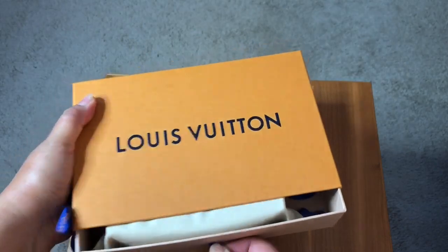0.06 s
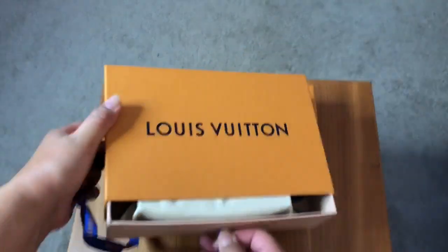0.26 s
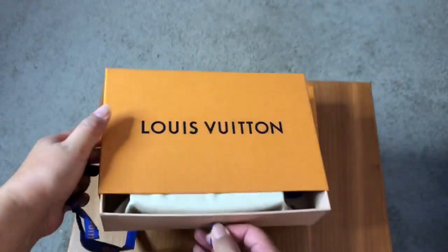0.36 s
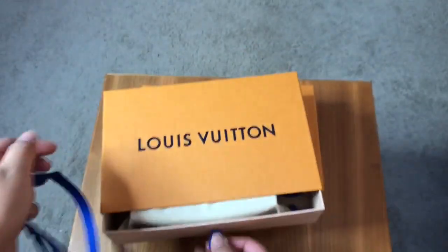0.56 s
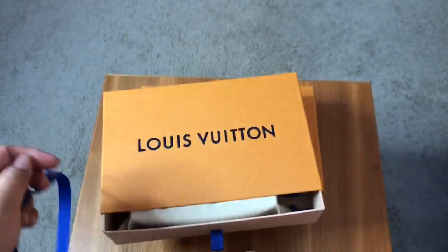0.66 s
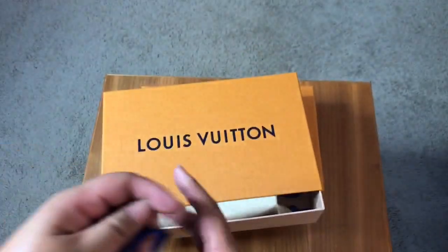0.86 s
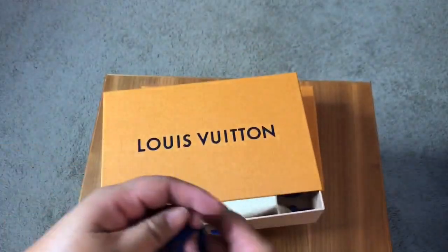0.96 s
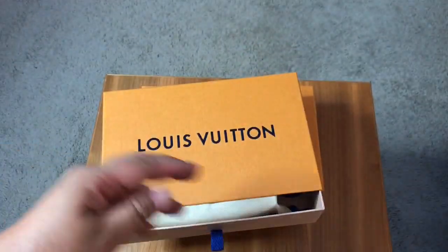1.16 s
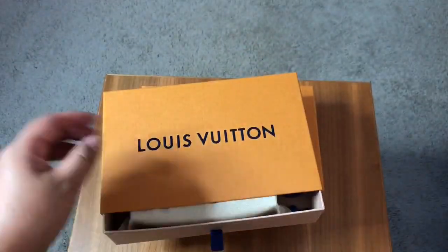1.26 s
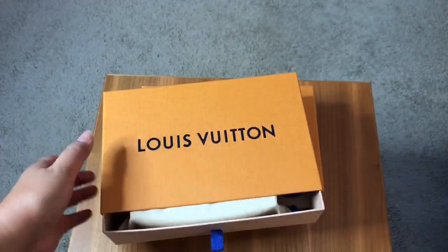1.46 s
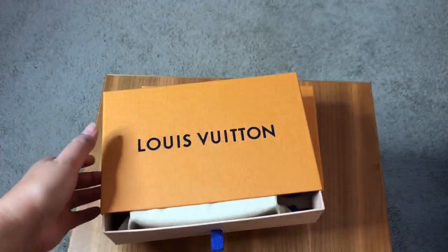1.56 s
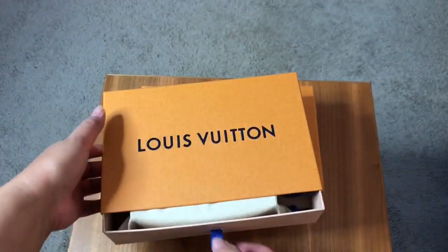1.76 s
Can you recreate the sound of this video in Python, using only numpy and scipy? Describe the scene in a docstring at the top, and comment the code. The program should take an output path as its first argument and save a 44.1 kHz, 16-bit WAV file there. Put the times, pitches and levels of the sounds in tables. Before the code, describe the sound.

Hollow double knock of a cardboard box landing on wood, then faint handling.

```python
"""In a small room, over a low rumble of air, fingers shift and tap on a cardboard gift box and a ribbon
brushes by. The box is set down on a wooden table: one edge lands with a hollow knock, pushing out air
that nudges the close microphone, then the base slaps flat and rocks. The ribbon swishes aside.
Last, the box's sleeve begins to slide with a soft rub as a fingertip taps it."""
import sys
import numpy as np
from scipy import signal
from scipy.fft import rfft, irfft, next_fast_len
from scipy.io import wavfile
from scipy.ndimage import map_coordinates

SR = 44100
rng = np.random.default_rng(int(sys.argv[2]) if len(sys.argv) > 2 else 0)


def master(y):
    """Save y as 16-bit WAV."""
    cut = np.clip(np.atleast_2d(y).T, -1, 1)
    pcm = np.round(cut * 32767)  # scale
    wavfile.write(sys.argv[1], SR, pcm.astype(np.int16))


N = 79380  # 1.8 s
TIME = np.arange(N) / SR


def gain(db):
    """Turn decibels into a number to multiply by."""
    return 10 ** (np.asarray(db) / 20)


def normalise(x):
    """Scale a sound to an average (rms) strength of 1."""
    return x / np.sqrt(np.mean(x ** 2) + 1e-20)


def value_at(points, hz):
    """Read between (frequency, value) points, spaced by octaves."""
    freqs, values = np.transpose(points)
    return np.interp(np.log(hz + 1), np.log(freqs + 1), values)


def filtered(x, gain_at):
    """Turn each frequency up or down by gain_at(hz)."""
    size = next_fast_len(N + SR // 2)
    hz = np.fft.rfftfreq(size, 1 / SR)
    return irfft(rfft(x, size) * gain_at(hz), size)[:N]


def noise(tone):
    """Noise shaped by a (frequency, level) table."""
    return normalise(filtered(rng.standard_normal(N), lambda hz: gain(value_at(tone, hz))))


def loudness(points):
    """A volume curve through (time, level) points."""
    return gain(np.interp(TIME, *np.transpose(points)))


def fade(t, fade_s):
    """Die away by 60 dB in fade_s seconds, the fade time."""
    return np.exp(-np.log(1000) * t / fade_s)


def hit(start, fade_s, attack_s=0.00027):
    """The volume curve of a blow: jump up, then die away."""
    age = np.maximum(TIME - start, 0)
    return (1 - np.exp(-age / attack_s)) * fade(age, fade_s)


def friction(tone, rough_db=2, catches_per_s=170):
    """Rubbing: noise roughened by fibres catching and letting go."""
    flutter = map_coordinates(rng.standard_normal(N), [TIME * catches_per_s])
    return normalise(noise(tone) * gain(rough_db * flutter))


# Tone of the background air (frequency [Hz], level [dB])
AIR_TONE = [(10, 5.5), (22, -8.5), (40, -18), (65, -29.5), (88, -21), (120, -32), (300, -37), (700, -50.5),
            (2000, -54.5), (8000, -59.5), (16000, -64)]
def room_air():
    """The quiet room and air on the microphone make a steady rumble."""
    return gain(-46) * noise(AIR_TONE)


# How loudly the fingers rub (time [s], level [dB])
GRIP_LEVELS = [(0, -49), (0.05, -46), (0.085, -54.5), (0.11, -45.5), (0.135, -59), (0.2, -62), (0.23, -83)]
# Tone of skin on card (frequency [Hz], level [dB])
SKIN_TONE = [(60, -17.5), (200, 4), (400, 6.5), (600, -6.5), (950, -3.5), (1600, -18), (4000, -23),
             (8000, -30.5), (15000, -46.5)]
def finger_rub():
    """Skin drags on the card as the grip shifts."""
    return loudness(GRIP_LEVELS) * friction(SKIN_TONE)


# Light finger taps (time [s], level [dB])
TAPS = [(0.108, -58.5), (1.4867, -43.5)]
# Tone of a tap (frequency [Hz], level [dB])
TAP_TONE = [(100, -20.5), (300, -9), (550, 7), (1500, 4.5), (2500, -11), (5000, -13), (9000, -21),
            (15000, -48.5)]
def finger_taps():
    """A fingertip makes a short tick, and the card rings briefly after it."""
    out = np.zeros(N)
    for start, db in TAPS:
        tick_and_ring = hit(start, fade_s=0.014) + gain(-12) * hit(start, fade_s=0.2)
        out += gain(db) * noise(TAP_TONE) * tick_and_ring
    return out


# Ribbon strokes (start [s], length [s], level [dB], brightness [dB per octave])
RIBBON_STROKES = [(0.116, 0.16, -64, -5), (0.682, 0.36, -64.5, -11.5), (0.831, .01, -67, 0),
                  (0.995, 0.09, -67.5, -0.5), (1.071, 0.028, -70, -3.5), (1.111, 0.029, -71.5, -0.5),
                  (1.15, 0.084, -74.5, 0), (1.195, 0.023, -64.5, -1.5), (1.387, 0.13, -78, -4.5)]
# Tone of the cloth (frequency [Hz], level [dB])
RIBBON_TONE = [(300, -23), (1500, -8.5), (2500, -9.5), (5500, -2.5), (9500, -4), (12000, -12.5),
               (16000, -22)]
def ribbon(tilt_above_hz=2000):
    """Soft strokes of cloth swell and fade, duller when dragged over card."""
    out = np.zeros(N)
    for start, length, db, brightness in RIBBON_STROKES:
        tilt = lambda hz: gain(brightness * np.log2(np.maximum(hz / tilt_above_hz, 1)))
        cloth = normalise(filtered(friction(RIBBON_TONE), tilt))
        swell = np.sin(np.pi * np.clip((TIME - start) / length, 0, 1))
        out += gain(db) * swell * cloth
    return out


# How the puff swells and dies (time [s], level [dB])
PUFF_LEVELS = [(0.2, -57), (0.25, -36.5), (0.4, -45.5), (0.62, -45.5), (0.72, -61), (0.85, -76)]
# Its deep tone (frequency [Hz], level [dB])
PUFF_TONE = [(10, 1), (30, -2), (65, -3.5), (110, -18), (300, -55)]
def air_puff():
    """Air pushed out from under the box nudges the microphone."""
    return loudness(PUFF_LEVELS) * noise(PUFF_TONE)


def ring(start, notes, length_s=0.25, scatter_db=1.2, detune=0.006, soften_s=0.00023):
    """Struck card rings with fading notes, a little different in level and pitch at every blow."""
    t = np.arange(int(length_s * SR)) / SR
    tones = np.zeros(len(t))
    for hz, db, fade_s in notes:
        level_luck, pitch_luck = rng.standard_normal(2)
        wave = np.sin(2 * np.pi * hz * (1 + detune * pitch_luck) * t)
        tones += gain(db + scatter_db * level_luck) * fade(t, fade_s) * wave
    soft_start = 1 - np.exp(-t / soften_s)  # card gives a little as it lands
    return np.interp(TIME - start, t, tones * soft_start, left=0, right=0)


# Notes of the box's air and broad faces (frequency [Hz], level [dB], fade time [s])
HOLLOW_NOTES = [(150.5, -23, 0.07), (217.1, -17, 0.2), (286.8, 2, 0.066), (326.4, -3.5, 0.06),
                (382, -16.5, 0.29)]
# Tone of the dull push on the table (frequency [Hz], level [dB])
THUD_TONE = [(20, -19.5), (60, -5.5), (130, -9.5), (300, 7.5), (700, -15), (3000, -61.5)]
def boom(start):
    """The hollow box booms as it thuds on the table."""
    return ring(start, HOLLOW_NOTES) + gain(-12) * noise(THUD_TONE) * hit(start, fade_s=0.065)


# Tone of the papery crack (frequency [Hz], level [dB])
CRACK_TONE = [(100, -18), (400, -1.5), (1000, 2), (1600, -0.5), (3000, -1.5), (5500, -4.5), (7500, -12.5),
              (9000, -19), (11000, -22), (12500, -35), (16000, -48)]
def crack(start, clack_hz, boost_db=10.5, width_octaves=0.4):
    """Card cracks on wood, boosted near the struck spot's pitch, and the contents rattle briefly."""
    clack = lambda hz: gain(boost_db * np.exp(-(np.log2((hz + 1) / clack_hz) / width_octaves) ** 2))
    card = normalise(filtered(noise(CRACK_TONE), clack))
    rattle = gain(-12.5) * hit(start, fade_s=0.15)
    return card * (hit(start, fade_s=0.014) + rattle)


# Box meeting table (time [s], boom level [dB], panel level [dB], crack level [dB], clack pitch [Hz])
KNOCKS = [(0.224, -19, -26.5, -33.5, 800), (0.2268, -15.5, -17.5, -11, 820),
          (0.2289, -21.5, -14.5, -18.5, 850), (0.2458, -16, -28, -22, 900), (0.4579, -33.5, -27, -26, 1150),
          (0.46, -24.5, -17, -19, 1700), (0.4628, -8, -18, -21, 1100), (0.4668, -16, -26.5, -26.5, 1200),
          (0.4866, -19, -37, -43, 1100), (0.5172, -43.5, -24, -25.5, 3300), (0.5209, -23, -26, -40, 1080),
          (0.5538, -28.5, -35.5, -65, 900)]
# Notes of the stiff card panels (frequency [Hz], level [dB], fade time [s])
PANEL_NOTES = [(438.2, -3, 0.028), (465, -3.5, 0.036), (527, -16.5, 0.22), (657.6, -2.5, 0.043),
               (738.3, -2.5, 0.041), (843, -1.5, 0.017), (916, -9, 0.066), (1009, -8, .07),
               (1130, -13, 0.025), (1552, -13.5, 0.09), (1860, -13, 0.032), (2666, -12, .03),
               (3617, -10.5, 0.023)]
def box_knocks(low_cut_hz=90):
    """One sound for each knock on the table: the box booms, cracks and rings its panels."""
    # Deep bass below about 90 Hz is cut from each knock.
    bass_cut = signal.butter(2, low_cut_hz, "highpass", fs=SR, output="sos")
    for start, boom_db, panel_db, crack_db, clack_hz in KNOCKS:
        knock = gain(boom_db) * boom(start)
        knock += gain(crack_db) * crack(start, clack_hz)
        knock += gain(panel_db) * ring(start, PANEL_NOTES)
        yield signal.sosfilt(bass_cut, knock)


# How loudly the sleeve slides (time [s], level [dB])
SLIDE_LEVELS = [(1.38, -90), (1.47, -75.5), (1.55, -65.5), (1.6, -68), (1.66, -65.5), (1.8, -64.5)]
# Tone of card on card (frequency [Hz], level [dB])
SLEEVE_TONE = [(80, 5.5), (250, 4.5), (600, 3.5), (900, -8.5), (1800, -2.5), (2700, -11.5), (3300, -10),
               (4500, -19), (9000, -28), (15000, -43)]
def sleeve_slide():
    """The outer sleeve rubs over the box's drawer."""
    return loudness(SLIDE_LEVELS) * friction(SLEEVE_TONE)


# How long the echo lasts (frequency [Hz], fade time [s])
ECHO_FADES = [(80, 0.61), (170, 0.29), (280, 0.34), (700, 0.39), (2000, 0.43), (4000, 0.41), (5500, 0.45),
              (8000, 0.31), (11000, 0.21), (15000, .18)]
# Tone of the echo (frequency [Hz], level [dB])
ECHO_TONE = [(80, -1), (170, -0.5), (280, -3.5), (700, -2), (1600, 0), (3500, -1), (6000, -3), (9000, -3),
             (14000, -5)]
def room_echo(sound, delay_s=0.0041, build_s=0.002):
    """The room answers with a smooth tail in which each frequency dies at its own speed."""
    hz, t, bands = signal.stft(rng.standard_normal(SR), SR, nperseg=256)
    bands *= fade(t, value_at(ECHO_FADES, hz)[:, None])
    _, tail = signal.istft(bands, SR, nperseg=256)
    age = np.maximum(np.arange(len(tail)) / SR - delay_s, 0)
    tail *= 1 - np.exp(-age / build_s)
    echo = signal.fftconvolve(sound, tail / np.linalg.norm(tail))[:N]
    return filtered(echo, lambda f: gain(value_at(ECHO_TONE, f)))


def scene():
    """The knocks and the handling, each with its own echo, over low moving air."""
    knocks = list(box_knocks())
    handling = finger_taps() + finger_rub() + sleeve_slide() + ribbon()
    mix = room_air() + air_puff()
    for sound in knocks + [handling]:
        mix += sound + gain(-8.5) * room_echo(sound)
    return mix[None]


def record(dry, top_hz=16200):
    """Cut away the very highest treble."""
    return filtered(dry[0], lambda hz: 1 / np.sqrt(1 + (hz / top_hz) ** 160))[None]


dry = scene()
out = record(dry)
master(out)
```